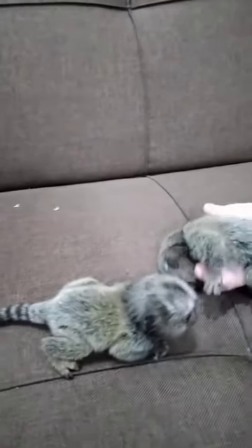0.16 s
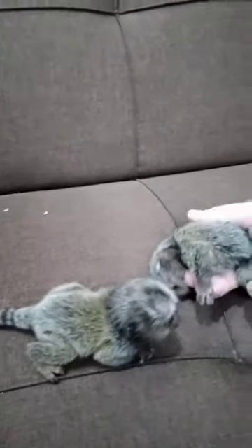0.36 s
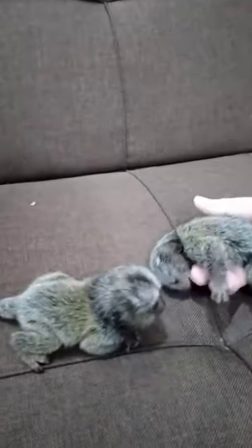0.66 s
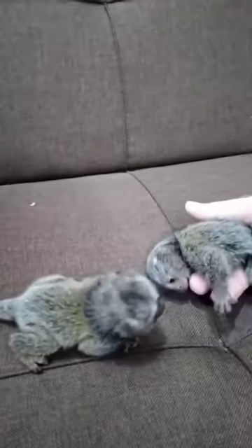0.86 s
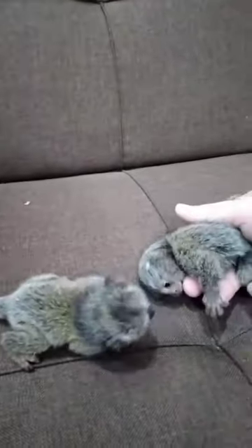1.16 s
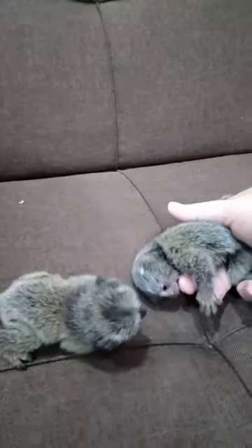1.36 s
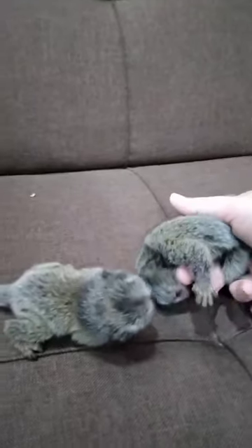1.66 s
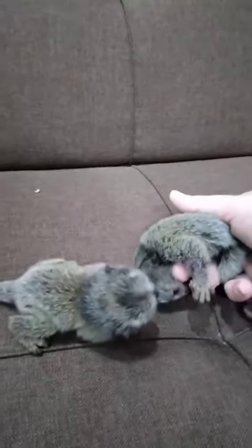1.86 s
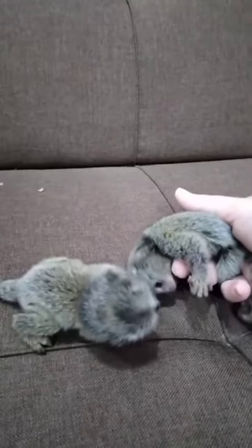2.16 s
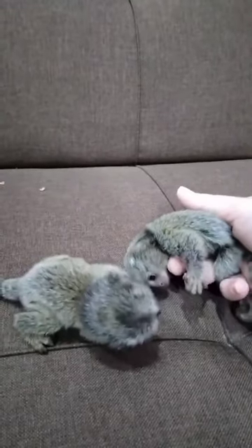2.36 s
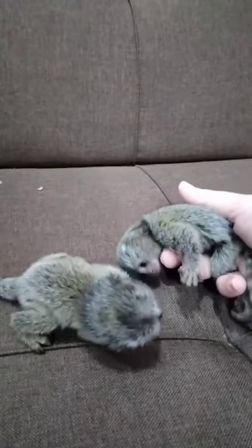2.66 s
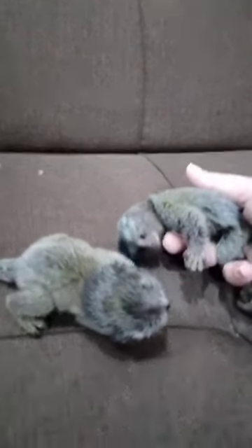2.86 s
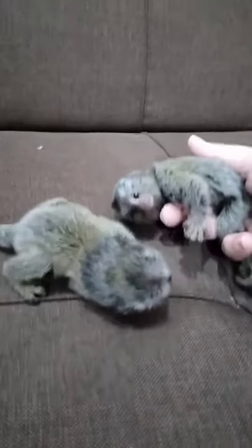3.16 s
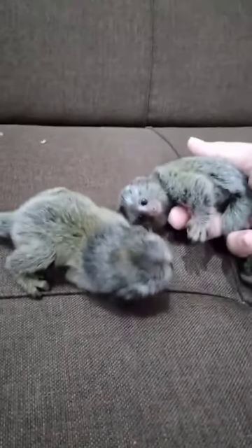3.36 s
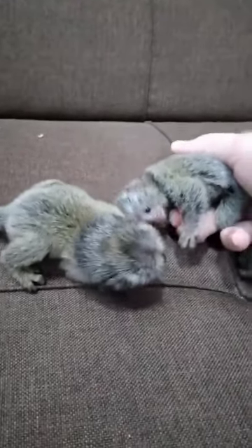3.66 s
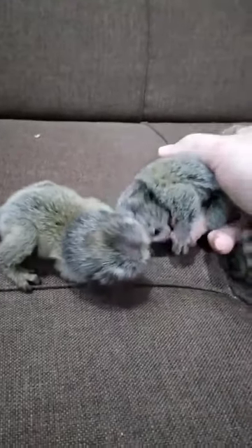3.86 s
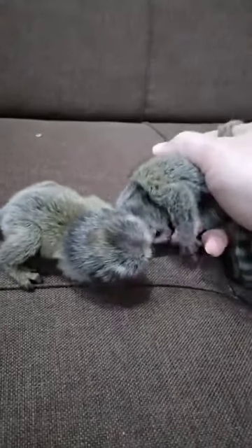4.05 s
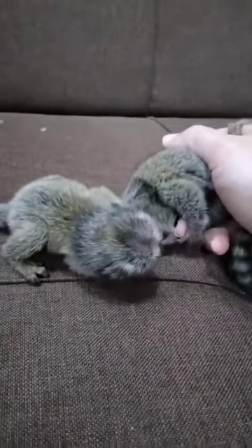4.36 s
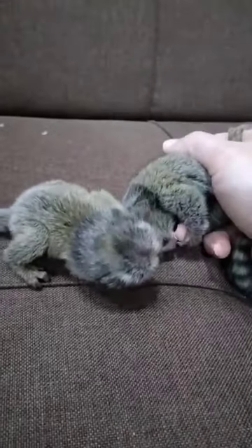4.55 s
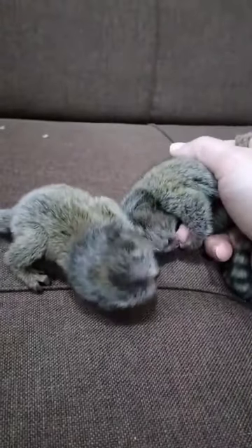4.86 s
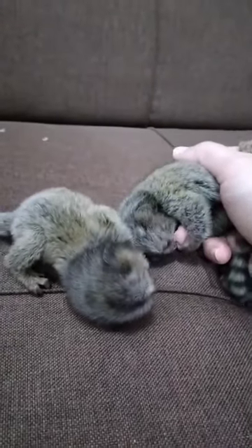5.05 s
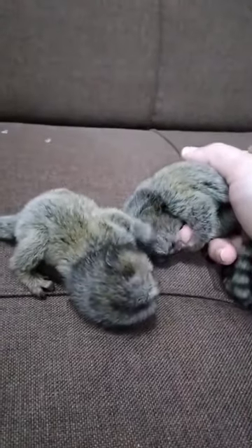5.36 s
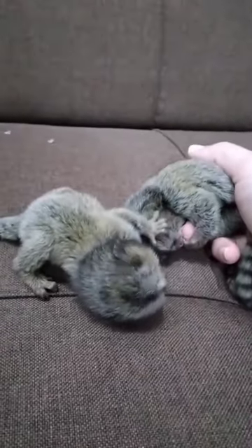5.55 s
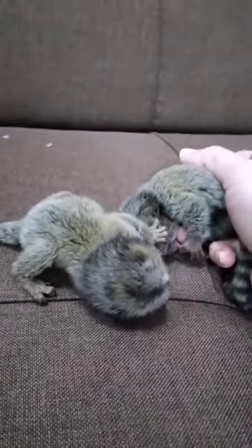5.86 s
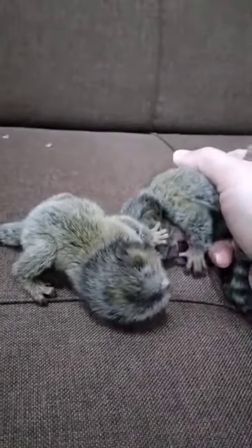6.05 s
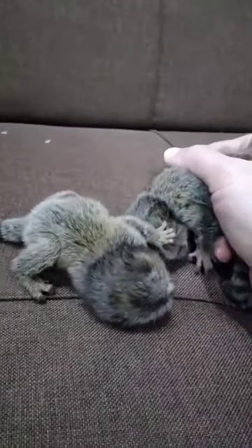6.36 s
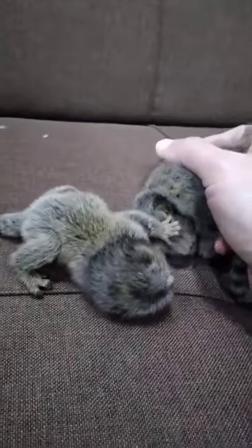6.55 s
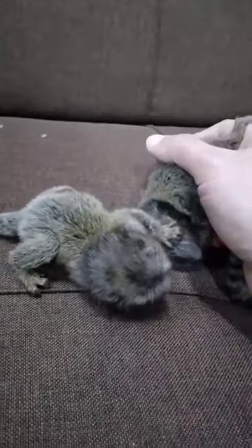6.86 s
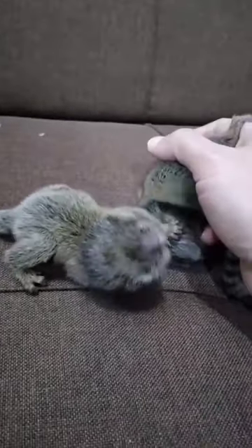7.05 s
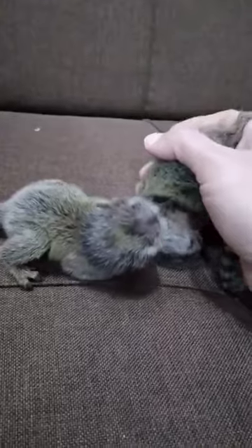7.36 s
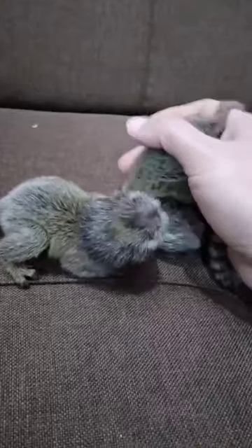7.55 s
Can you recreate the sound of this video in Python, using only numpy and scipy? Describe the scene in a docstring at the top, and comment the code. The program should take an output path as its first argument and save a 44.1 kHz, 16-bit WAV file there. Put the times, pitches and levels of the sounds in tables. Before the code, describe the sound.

A quiet living room with soft, steady background noise. Throughout, small birds a few metres away give thin, trilled peeps about twice a second, mixed with faint whistles and very high squeaks, all softened by a short room echo. Sharper, downward-hooked chirps stand out at about 0.2, 2.2 and 6.8 seconds. From 2.7 seconds, short squeals that break into a raspy buzz recur roughly every half second. The loudest bird sound is a quick run of warbling notes between 4.1 and 4.4 seconds. A low engine hum comes through the walls, faint at first, swelling from about 3.5 seconds and strongest from 6 to 7 seconds as its pitch sinks slightly, then easing a little before the end at 7.7 seconds. Close to the microphone, baby monkeys crawling on a sofa make very faint, dry fur rustles and scattered tiny claw ticks.

```python
"""Faint room noise, a low hum and fur brushing upholstery: a quiet living room where two baby marmosets
crawl on a sofa, their claws catching in the weave. Small animals, most likely cage birds, peep, chirp and
chatter some metres off, so their thin, warbling whistles arrive mostly as room reverberation.
The hum is an engine heard through the walls; it swells as it slows."""
import sys
import numpy as np
from scipy import signal
from scipy.fft import rfft, irfft
from scipy.io import wavfile
from scipy.ndimage import map_coordinates

SR = 44100
rng = np.random.default_rng(int(sys.argv[2]) if len(sys.argv) > 2 else 0)


def master_out(mix):
    """Clip the mix to full scale and print it as 16-bit PCM to the path in sys.argv[1]."""
    frames = np.transpose(np.atleast_2d(mix))
    ceiling = np.clip(frames, -1, 1)
    pcm = np.round(ceiling * 32767).astype(np.int16)
    wavfile.write(sys.argv[1], SR, pcm)


N = 339570
TIME = np.arange(N) / SR

# tone colour of the room noise: (frequency [Hz], relative spectral level [dB])
ROOM_SPECTRUM = [(20, 4.5), (44, 2.5), (100, -6.5), (200, -9.5), (274, -15), (564, -19.5), (1300, -19),
                 (3640, -29), (6720, -29.5), (8880, -41), (11400, -54), (15500, -31.5)]
# broad humps of hiss: (centre [Hz], half width [Hz], level [dB])
HISS_BANDS = [(5180, 840, -68), (9210, 1900, -67.5), (12700, 730, -79.5)]
# the engine slowing down: (time [s], firing rate [Hz])
FIRING_RATE = [(0.0, 58.96), (1.56, 59.09), (4.61, 57.56), (7.7, 54.9)]
# fader curves of the hum, ahead of each harmonic's trim:
# (time [s], fundamental [dB], octave [dB], third and fourth harmonics [dB])
HUM_FADERS = [(0.0, -81, -74, -71), (0.21, -64, -66.5, -64.5), (0.86, -63.5, -58, -74.5),
              (3.26, -55.5, -56, -65.5), (3.6, -48, -63.5, -64.5), (5.04, -46, -53.5, -61),
              (5.81, -37, -60, -60.5), (5.88, -35.5, -59, -53), (6.15, -35, -54.5, -59.5),
              (6.91, -37, -52, -58.5), (7.06, -37.5, -65, -65.5), (7.18, -36, -58, -60.5),
              (7.66, -41.5, -46, -59), (7.7, -41.5, -54, -48)]
# weak upper harmonics of the hum: (multiple of the firing rate, level at the top of the swell [dB])
HUM_OVERTONES = [(5, -72), (6, -74.5), (7, -74), (9, -73.5)]
# fur and fingers stroking the upholstery: (peak time [s], half length [s], relative level [dB])
FUR_STROKES = [(.15, .2, -74), (2.296, 0.054, -64), (2.7, 0.19, -66), (3.7, .12, -66), (4.098, 0.23, -65),
               (4.89, .07, -66), (6.03, 0.064, -66), (7.007, .06, -70), (7.44, 0.1, -66)]
# thin, purer whistles among the peeps: (time [s], pitch [Hz], level [dB])
THIN_WHISTLES = [(.01, 5370, -65), (.75, 4780, -71), (1.27, 5400, -65), (1.421, 4620, -69),
                 (1.83, 4630, -73), (1.87, 5450, -69), (1.93, 4720, -67), (1.95, 5820, -64),
                 (2.37, 5440, -63.5), (2.79, 5350, -64.5), (3.54, 5820, -63), (3.765, 4730, -57),
                 (4.04, 4730, -59), (4.24, 5410, -61), (4.66, 5140, -63.5), (4.87, 5570, -60.5),
                 (4.94, 4796, -60.5), (5.98, 4840, -65), (6.035, 5720, -64.5), (6.39, 5450, -68),
                 (6.54, 4850, -63.5), (6.95, 5800, -66.5), (7.345, 4900, -58), (7.62, 4780, -61),
                 (7.64, 5730, -62)]
# one caller's trilled peep, about twice a second: (time [s], length [s])
PEEP_RHYTHM = [(0.189, 0.08), (.605, 0.053), (0.951, 0.077), (1.477, 0.074), (2.029, 0.13), (2.5, 0.094),
               (2.938, 0.08), (3.362, 0.075), (3.821, 0.142), (4.477, 0.093), (5.139, 0.066),
               (5.726, 0.053), (6.238, 0.099), (6.76, 0.024), (6.856, 0.059), (7.525, 0.11)]
# lower song notes, from pure whistles to trills:
# (time [s], length [s], start pitch [Hz], end pitch [Hz], relative level [dB], warble depth [Hz])
SONG_NOTES = [(.07, 0.064, 2930, 3150, -65, 320), (1.13, 0.089, 1855, 1860, -63.5, 230),
              (1.71, 0.027, 3380, 3230, -66.5, 55), (1.75, 0.15, 3250, 3300, -70, 18),
              (1.94, 0.071, 3140, 3280, -60.5, 110), (2.07, 0.063, 2930, 2550, -63, 300),
              (2.58, 0.066, 2560, 3010, -62, 300), (3.382, .04, 2470, 2300, -63.5, 190),
              (4.092, 0.052, 3120, 3573, -40, 275), (4.195, 0.034, 2285, 2460, -47, 75),
              (4.228, 0.042, 2520, 2900, -37.5, 210), (4.266, 0.027, 2571, 2572, -33.5, 65),
              (4.32, 0.067, 2650, 2674, -46, 190), (4.333, 0.03, 3240, 3277, -45, 85),
              (4.295, 0.028, 3930, 3900, -56.5, 110), (4.43, 0.018, 2653, 2654, -52.5, 58),
              (4.825, 0.11, 3510, 3630, -53, 110), (4.925, 0.11, 2293, 2540, -55, 145),
              (5.34, 0.018, 3240, 3200, -55, 70), (5.92, 0.13, 3170, 3170, -60.5, 140),
              (6.04, .2, 1390, 1543, -67, 110), (6.73, 0.042, 2580, 2500, -65, 90),
              (7.14, .067, 2905, 2870, -58.5, 240)]
# hooked chirps: (time [s], level [dB], octave level [dB], warble depth [Hz])
HOOKED_CHIRPS = [(0.174, -44.5, -62, 85), (0.85, -58, -61, 280), (2.184, -45, -60, 120),
                 (6.818, -44, -68, 65)]
# one chirp's slur, loudest as it drops: (time into the chirp [s], pitch [Hz], relative level [dB])
CHIRP_CONTOUR = [(0, 3270, -9.5), (.014, 3316, 1.5), (0.021, 2880, 3), (.048, 2870, -5), (.06, 2720, -12)]
# very high squeaks: (time [s], pitch [Hz], level [dB])
HIGH_SQUEAKS = [(.18, 10500, -67), (.327, 9020, -63.5), (.58, 9050, -61.5), (1.18, 9000, -62),
                (1.543, 8500, -66), (1.691, 8900, -65), (2.059, 9020, -63), (2.409, 8650, -64),
                (3.299, 8650, -65), (3.54, 9100, -58.5), (3.89, 9040, -60), (4.022, 8760, -60),
                (4.71, 8600, -61), (4.843, 10800, -57.5), (5.14, 8830, -65), (5.195, 9060, -56.5),
                (5.451, 8710, -62), (6.039, 8700, -63), (6.61, 9530, -58), (6.89, 9600, -60),
                (7.136, 8870, -60), (7.375, 9130, -61), (7.661, 8930, -63)]
# two-voiced squeals that break into a buzz: (time [s], squeal length [s], low voice start pitch [Hz],
# buzz length [s], buzz top [Hz], low voice relative level [dB], high voice relative level [dB],
# buzz level [dB], low voice warble depth [Hz], high voice warble depth [Hz])
RASPING_CALLS = [(2.689, .026, 2720, 0.034, 6800, -59.5, -57.5, -56.3, 100, 450),
                 (2.974, 0.047, 2650, 0.072, 6200, -58, -61.5, -60, 165, 300),
                 (3.528, .044, 2610, 0.089, 5600, -61, -61, -59.5, 80, 130),
                 (4, 0.057, 2710, 0.27, 7500, -56.5, -60.5, -62.5, 300, 130),
                 (4.688, 0.064, 2740, .09, 4740, -58.5, -61, -57.5, 130, 130),
                 (5.269, .055, 2650, 0.053, 4320, -58, -60.5, -56, 140, 600),
                 (5.745, 0.037, 3080, 0.12, 3950, -67, -80, -62, 150, 300),
                 (6.188, 0.063, 2680, 0.022, 4500, -56.5, -84, -63.5, 260, 300),
                 (6.67, 0.026, 2620, 0.026, 4400, -68, -76, -67, 200, 300),
                 (7.289, 0.047, 2660, 0.018, 4540, -60.5, -77, -61, 155, 300)]


def undb(db):
    """Decibels to gain."""
    return 10 ** (np.asarray(db) / 20)


def unit(x):
    """Scale to an rms of one."""
    return x / np.sqrt(np.mean(x ** 2))


def add(track, time_s, sound):
    """Mix a sound into the track at the given time."""
    start = max(int(time_s * SR), 0)
    part = sound[:max(N - start, 0)]
    track[start:start + len(part)] += part


def wander(rate_hz, size=N):
    """Smooth random modulation with a spread near one."""
    points = rng.standard_normal(4096)
    place = np.arange(size) / SR * rate_hz
    return map_coordinates(points, [place], order=2, mode="wrap")


def coloured_noise(gain, size=N):
    """Noise of unit rms whose spectrum follows gain(frequency)."""
    hz = np.fft.rfftfreq(size, 1 / SR) + 1
    return unit(irfft(rfft(rng.standard_normal(size)) * gain(hz), size))


def noise_band(centre_hz, half_width_hz, size=N):
    """Noise in one bell-shaped band."""
    return coloured_noise(lambda hz: np.exp(-((hz - centre_hz) / half_width_hz) ** 2), size)


def room_tone(noise_db=-55, drone_hz=77, drone_db=-63, tone_hz=573, tone_db=-79, flicker_db=3):
    """The bed: steady room noise, a faint low drone, a thin tone and softly flickering hiss."""
    hz, db = np.transpose(ROOM_SPECTRUM)
    out = undb(noise_db) * coloured_noise(lambda f: undb(np.interp(np.log(f), np.log(hz), db)))
    out += undb(drone_db) * noise_band(drone_hz, 1.14) + undb(tone_db) * noise_band(tone_hz, 2)
    for centre_hz, half_width_hz, hiss_db in HISS_BANDS:
        out += undb(hiss_db + flicker_db * wander(12)) * noise_band(centre_hz, half_width_hz)
    return out


def engine_hum(waver_db=1.97, flutter_db=2, smear_rad=.55, swell_share=.52, rumble_db=-66):
    """The walls pass mainly the firing rate; wavering overtones and a low rumble swell with it."""
    phase = 2 * np.pi * np.cumsum(np.interp(TIME, *np.transpose(FIRING_RATE))) / SR
    times, *faders = np.transpose(HUM_FADERS)
    fundamental_db, octave_db, upper_db = (np.interp(TIME, times, fader) for fader in faders)
    swell_db = swell_share * (fundamental_db - fundamental_db.max())
    hum = undb(fundamental_db) * np.sin(phase)
    hum += undb(octave_db - .23) * np.sin(2 * phase + rng.uniform(0, 2 * np.pi))
    harmonics = [(3, upper_db - 5), (4, upper_db - 4)]
    harmonics += [(multiple, db + swell_db) for multiple, db in HUM_OVERTONES]
    for multiple, db in harmonics:
        gain = undb(db + waver_db * wander(3.2) + flutter_db * wander(12))
        hum += gain * np.sin(multiple * phase + smear_rad * wander(7) + rng.uniform(0, 2 * np.pi))
    rumble = noise_band(343, 284) + undb(-3.5) * noise_band(710, 1100)
    return np.sqrt(2) * hum + undb(rumble_db + swell_db) * rumble


def fur_rustle(fidget_db=-70.5, trim_db=-2, grain_db=3, uneven_db=3):
    """Fibres slip over the weave in tiny bursts; each stroke swells out of a faint, constant fidgeting."""
    stroke_power = sum(undb(db) ** 2 * np.exp(-((TIME - peak_s) / half_s) ** 2)
                       for peak_s, half_s, db in FUR_STROKES)
    envelope = np.sqrt(undb(fidget_db) ** 2 + stroke_power)
    slips = unit(undb(grain_db * wander(900) + uneven_db * wander(28)))
    return undb(trim_db) * envelope * slips * noise_band(13500, 3000)


def swell(size):
    """Rounded rise and fall of one call."""
    return unit(np.sin(np.pi * (np.arange(size) + .5) / size))


def whistle(pitch, depth_hz, warble_hz=215, unsteady=.12, jitter=.28, waver=.00886):
    """A wavering, near-sine voice; a second, slower vibration swings its pitch and makes it rasp."""
    size = len(pitch)
    warble_rate = warble_hz * (1 + unsteady * wander(85, size))
    swing = np.sin(2 * np.pi * np.cumsum(warble_rate) / SR)
    hz = pitch * (1 + waver * wander(131.5, size))
    hz += depth_hz * (swing + jitter * wander(502.3, size))
    return unit(np.sin(2 * np.pi * np.cumsum(hz) / SR))


def glides(rows, pad_s=.007):
    """Short gliding whistles, padded at both ends to fade in and out; rows as in SONG_NOTES."""
    out = np.zeros(N)
    for time_s, length_s, start_hz, end_hz, db, depth_hz in rows:
        size = int((length_s + 2 * pad_s) * SR)
        voice = whistle(np.linspace(start_hz, end_hz, size), depth_hz)
        add(out, time_s - pad_s, undb(db) * swell(size) * voice)
    return out


def twitter(centre_hz, spread_hz, db, depth_hz, count):
    """Faint filler calls, one at a random moment in each equal slot of time."""
    rows = []
    for slot, (when, length, pitch, slope, loudness) in enumerate(rng.random((count, 5))):
        time_s = (slot + when) * N / SR / count
        start_hz = centre_hz + spread_hz * (2 * pitch - 1)
        end_hz = start_hz + spread_hz * (slope - .5)
        rows.append((time_s, .0394 + .041 * length, start_hz, end_hz, db + 6 * (loudness - .5), depth_hz))
    return glides(rows)


def peeps(peep_hz=5117, rise_hz=111.8, shimmer_hz=12900, thin_s=.058, thin_rise_hz=72.6):
    """A repeated trilled peep with a high shimmer, amid thin whistles and a faint twitter."""
    trilled = [(time_s, length_s, peep_hz, peep_hz + rise_hz, -57.5, 205)
               for time_s, length_s in PEEP_RHYTHM]
    shimmer = [(time_s, length_s, shimmer_hz, shimmer_hz, -73, 400) for time_s, length_s in PEEP_RHYTHM]
    thin = [(time_s, thin_s, hz - thin_rise_hz / 2, hz + thin_rise_hz / 2, db, 100)
            for time_s, hz, db in THIN_WHISTLES]
    return glides(trilled + shimmer + thin) + twitter(5120, 475.6, db=-68, depth_hz=70, count=40)


def song(trim_db=-.3):
    """Lower whistled notes; a deep warble turns a pure note into a trill."""
    return undb(trim_db) * glides(SONG_NOTES)


def chirps(octave_depth_hz=200):
    """A whistle slurs down the same hook each time, never quite alike, with a weaker octave."""
    out = np.zeros(N)
    times, hz, contour_db = np.transpose(CHIRP_CONTOUR)
    t = np.arange(int(times[-1] * SR)) / SR
    pitch = np.interp(t, times, hz)
    envelope = undb(np.interp(t, times, contour_db))
    for time_s, db, octave_db, depth_hz in HOOKED_CHIRPS:
        voice = undb(db) * whistle(pitch, depth_hz)
        octave = undb(octave_db) * whistle(2 * pitch, octave_depth_hz)
        add(out, time_s, envelope * (voice + octave))
    return out


def squeaks(length_s=.039, depth_hz=507):
    """Tiny, strongly warbling whistles over fainter scattered ones."""
    rows = [(time_s, length_s, hz, hz, db, depth_hz) for time_s, hz, db in HIGH_SQUEAKS]
    return glides(rows) + twitter(9000, 590.4, db=-70.5, depth_hz=457.2, count=24)


def claw_scratches(softest_db=-75.75, range_db=5, decay_s=.0079, count=22):
    """Tiny claws catch in the weave now and then, each a bright tick of noise."""
    out = np.zeros(N)
    t = np.arange(SR // 10) / SR
    for when, loudness in rng.random((count, 2)):
        tick = np.exp(-t / decay_s) * noise_band(11000, 5500, len(t))
        add(out, when * N / SR, undb(softest_db + range_db * loudness) * tick)
    return out


def squeals(low_rise_hz=211.5, high_hz=6640, high_rise_hz=117, trim_db=-.6):
    """A low and a high voice rise together to open each rasping call."""
    rows = []
    for time_s, length_s, low_hz, _, _, low_db, high_db, _, low_depth_hz, high_depth_hz in RASPING_CALLS:
        rows.append((time_s, length_s, low_hz, low_hz + low_rise_hz, low_db, low_depth_hz))
        rows.append((time_s, length_s, high_hz, high_hz + high_rise_hz, high_db, high_depth_hz))
    return undb(trim_db) * glides(rows, pad_s=.011)


def chatter(buzz_hz=170, throb=.61, bottom_hz=2560, climb_s=.036, pad_s=.02, tilt_db=-2, bands=6):
    """Each squeal breaks into a chaotic buzz: throbbing noise bands enter from low to high."""
    out = np.zeros(N)
    for time_s, squeal_s, _, buzz_s, top_hz, _, _, db, _, _ in RASPING_CALLS:
        size = int((buzz_s + 2 * pad_s) * SR)
        pulsing = 1 + throb * np.sin(2 * np.pi * buzz_hz * np.arange(size) / SR)
        envelope = unit(swell(size) * pulsing)
        step_hz = (top_hz - bottom_hz) / bands
        break_s = time_s + .9 * squeal_s - pad_s  # the voice cracks near the end of the squeal
        for band in range(bands):
            height = band / bands - .5
            rasp = noise_band(bottom_hz + (band + .5) * step_hz, step_hz, size)
            gain = undb(db + tilt_db * height) / np.sqrt(bands)
            add(out, break_s + climb_s * height, gain * envelope * rasp)
    return out


def room_reverb(x, t60_s, direct_db, early_db=-4, early_s=.035, bloom_s=.027, reflections=14):
    """A direct path and a few wall reflections, their levels set against a diffuse tail."""
    t = np.arange(SR) / SR
    response = rng.standard_normal(SR) * np.exp(-np.log(1000) * t / t60_s) * (1 - np.exp(-t / bloom_s))
    response /= np.linalg.norm(response)
    lags = (rng.uniform(.05147, 1, reflections) * early_s * SR).astype(int)
    response[lags] += undb(early_db) * rng.choice([-1, 1], reflections) / np.sqrt(reflections)
    response[0] += undb(direct_db)
    return signal.fftconvolve(x, response / np.linalg.norm(response))[:N]


def scene():
    """The mono mix: callers sit at different distances in the reverb; hum, bed and sofa sounds stay dry."""
    calls = room_reverb(song() + squeals() + chatter(), t60_s=.52, direct_db=-.5)
    calls += room_reverb(chirps(), t60_s=.38, direct_db=-5)
    calls += room_reverb(peeps(), t60_s=.42, direct_db=-1.5)
    calls += room_reverb(squeaks(), t60_s=.45, direct_db=-.5)
    return (calls + engine_hum() + room_tone() + fur_rustle() + claw_scratches())[None]


def record(dry):
    """The phone cuts the top of the treble."""
    cutoff_hz = 15650
    return signal.sosfilt(signal.ellip(10, .2, 80, cutoff_hz, fs=SR, output="sos"), dry)


dry = scene()
out = record(dry)
master_out(out)
```